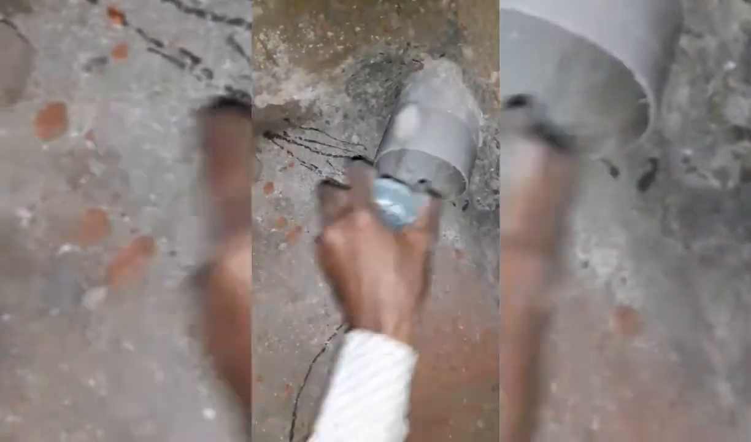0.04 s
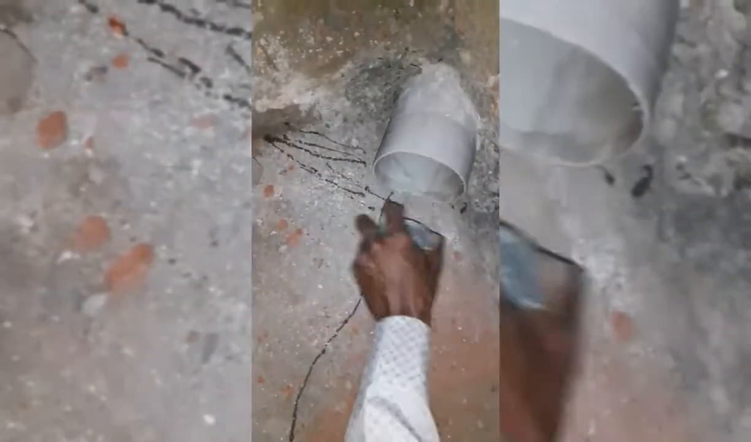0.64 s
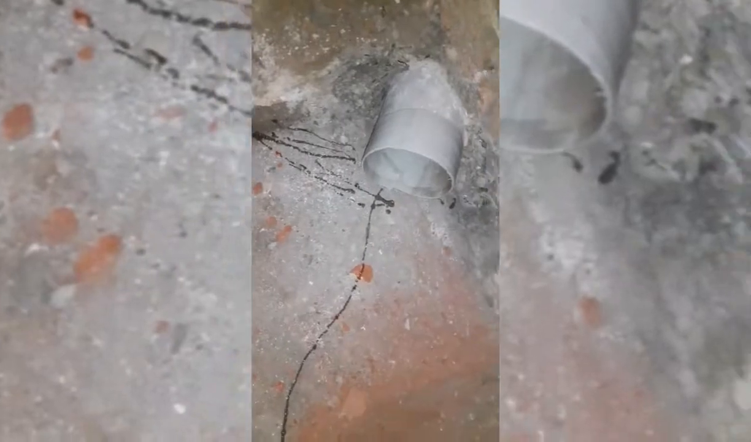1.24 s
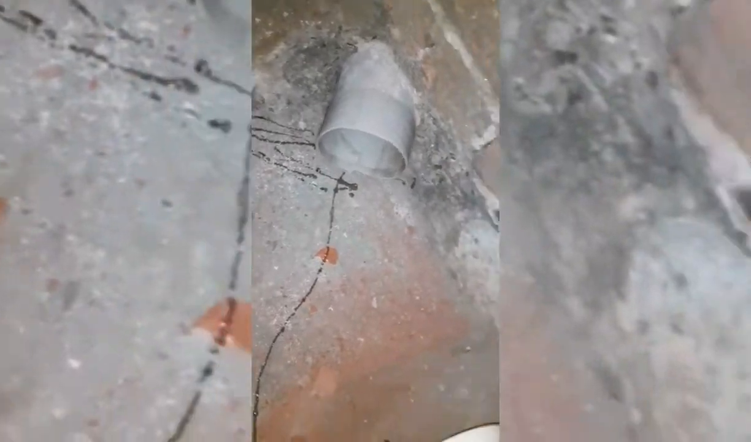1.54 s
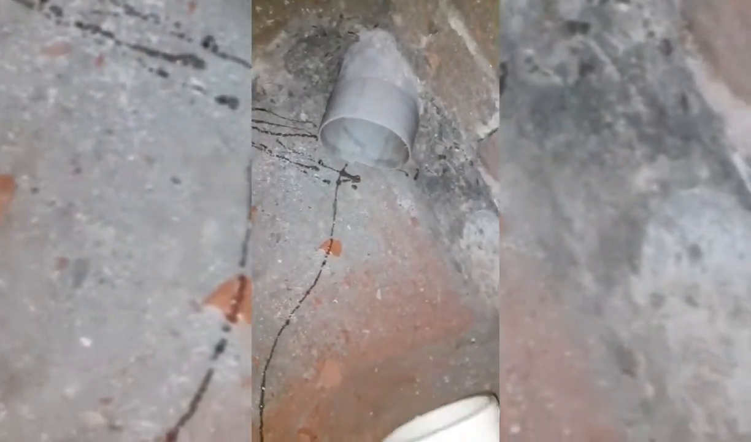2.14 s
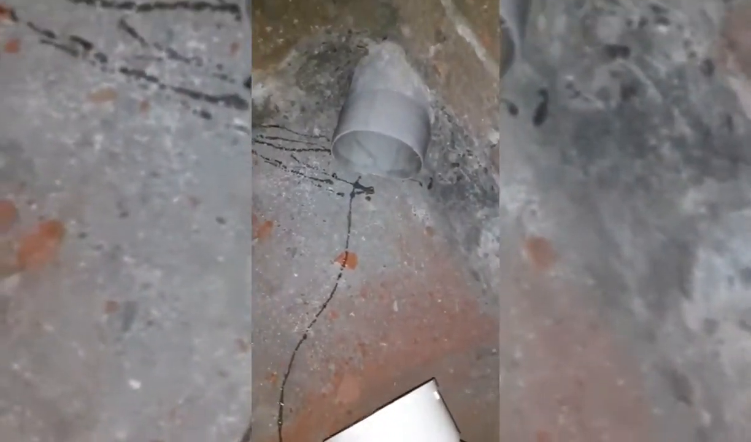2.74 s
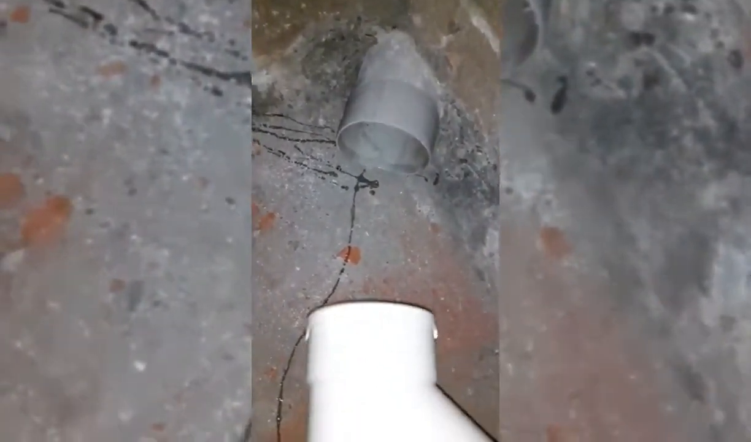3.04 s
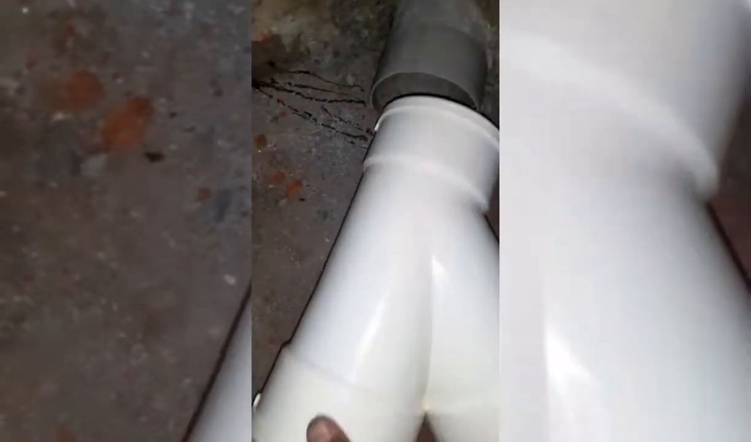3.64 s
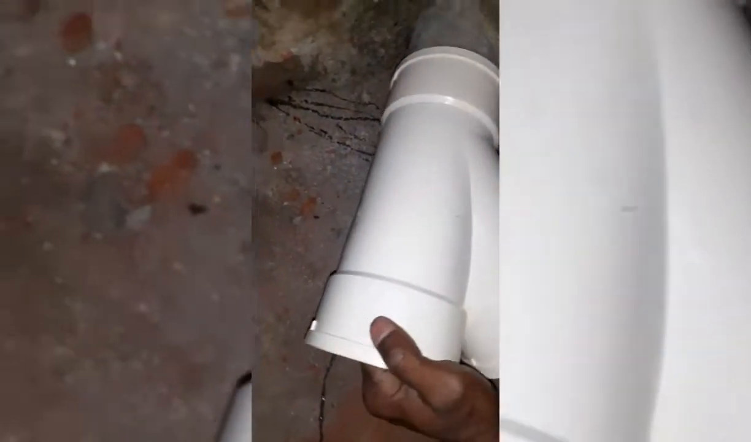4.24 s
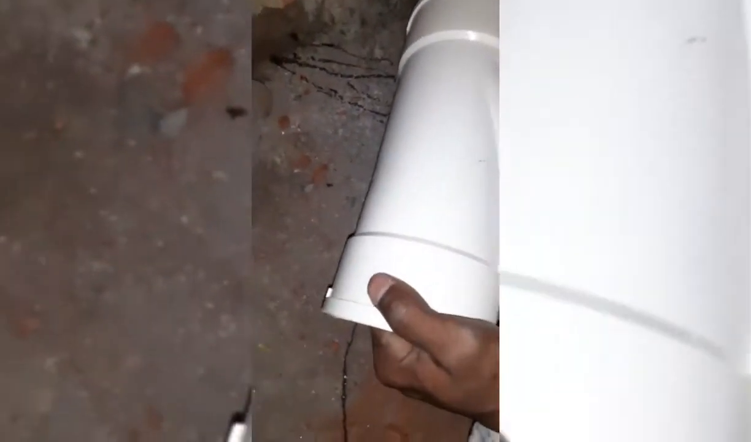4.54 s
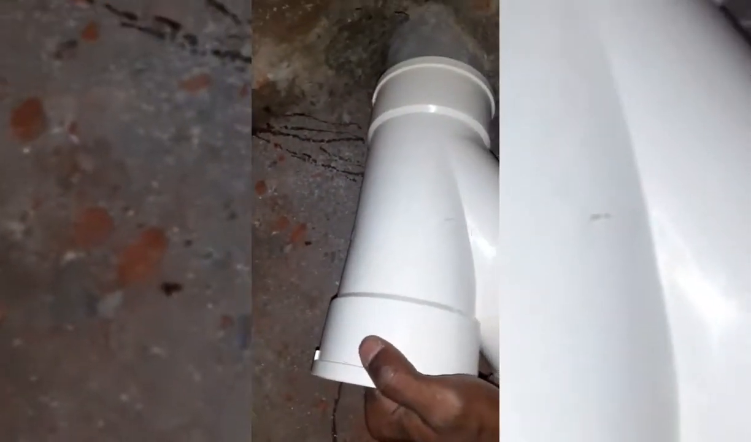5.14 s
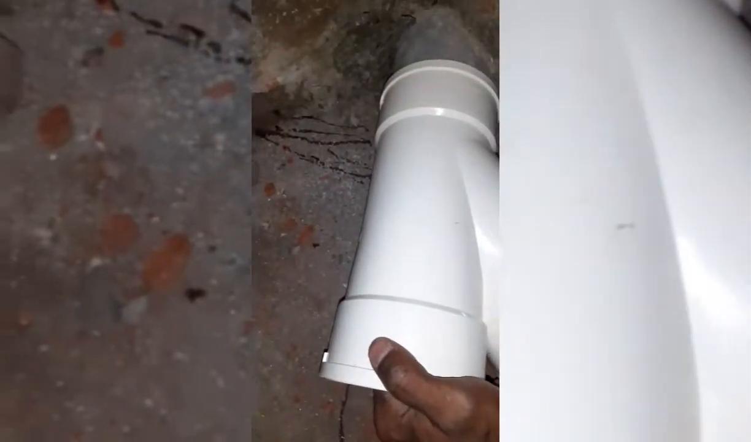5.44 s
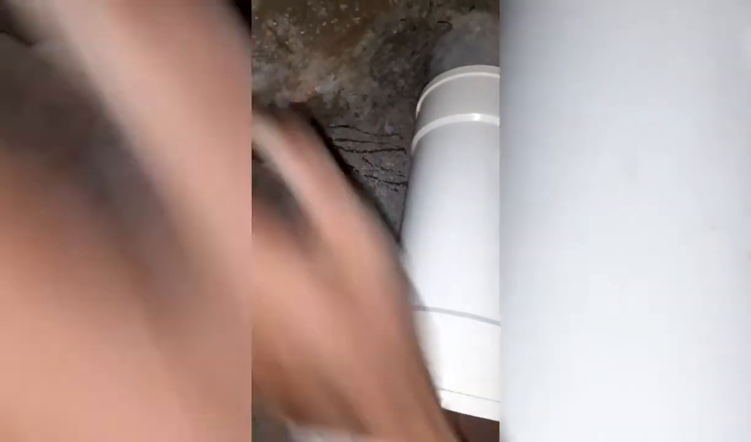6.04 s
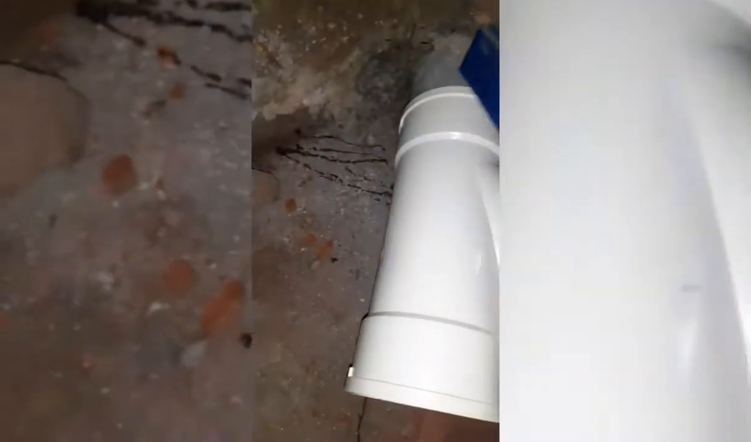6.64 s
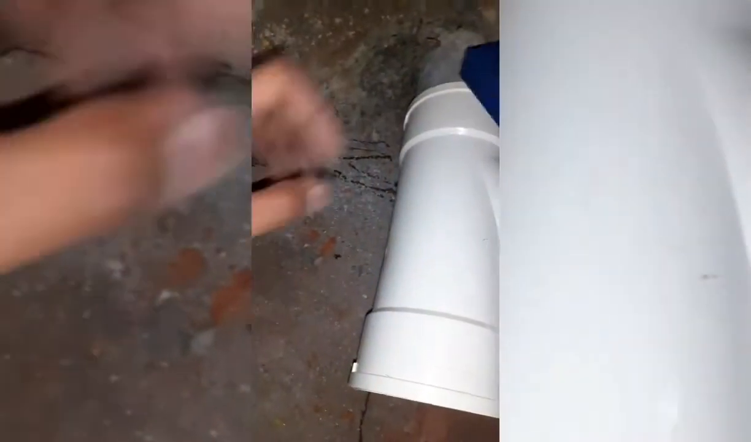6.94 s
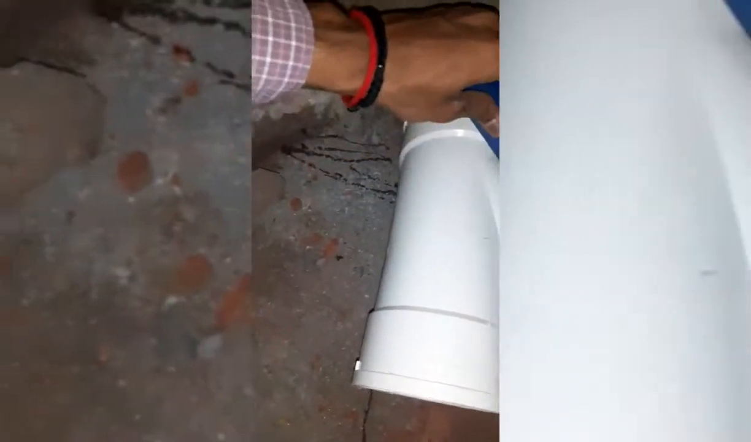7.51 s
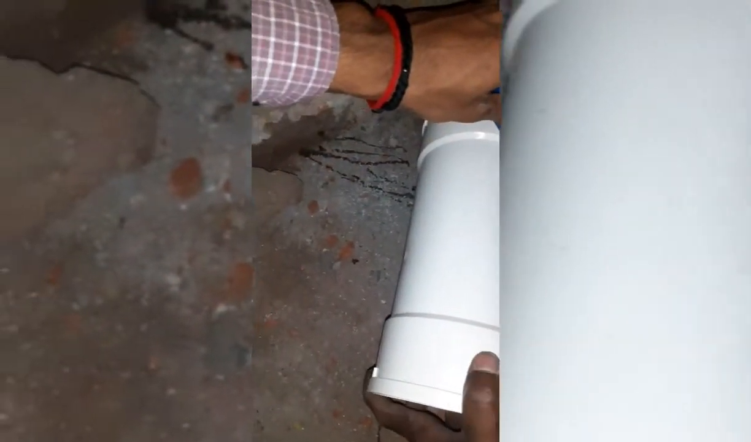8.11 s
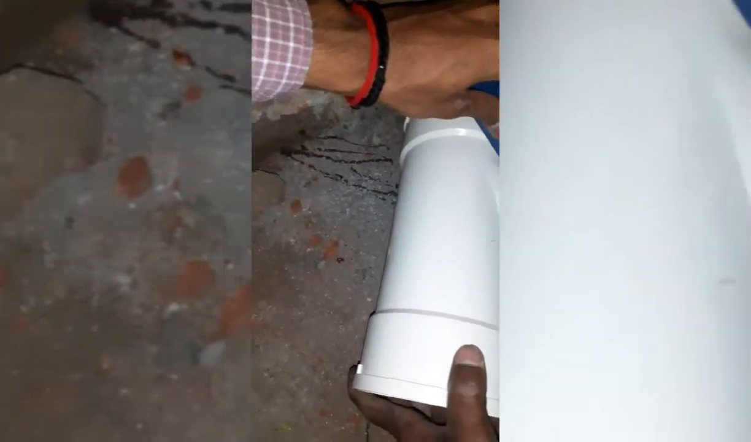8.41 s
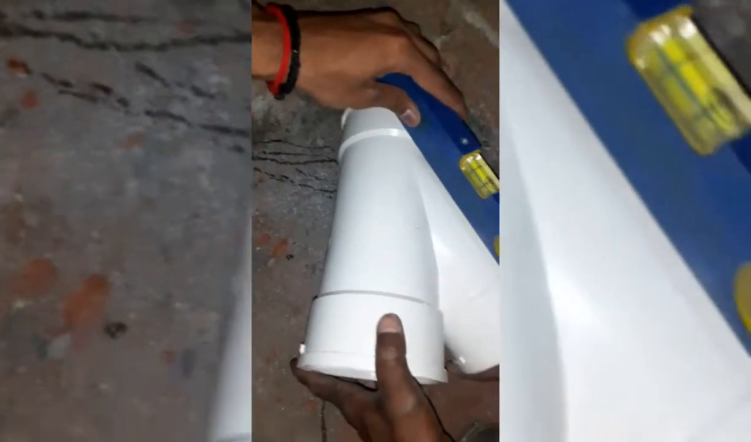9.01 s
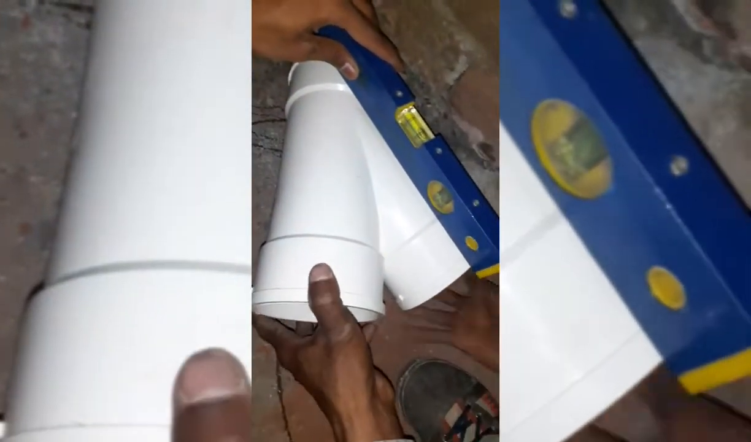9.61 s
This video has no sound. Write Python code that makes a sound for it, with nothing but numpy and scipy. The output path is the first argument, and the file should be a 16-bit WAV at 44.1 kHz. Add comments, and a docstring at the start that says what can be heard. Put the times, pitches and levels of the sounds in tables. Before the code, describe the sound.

A faint low hum runs throughout in a small bare room, with the work close to the microphone and slightly to the right. Between 0.5 and 0.9 seconds a small plastic case scuffs on gritty concrete. Soft rubbing, a light knock and small scrapes follow until about 2.5 seconds. From 3 seconds a plastic pipe fitting scrapes and knocks hollowly as it is pushed onto a drain pipe, and at 3.8 seconds the joint closes with a short, loud, hollow boom. Lighter bumps and scrapes come just after 4 seconds and at 5. A sharp scrape at 6.3 seconds leads into a quick run of about ten ringing clacks from 6.6 to 7.5 seconds, as a spirit level is set on the fitting. After that come faint rubbing of hands on plastic, a dull bump at 8.7 seconds and two tiny knocks just past 9.

```python
"""Fitting a drain pipe in a small bare room.

Close to a hand-held phone, over a steady low hum, a small plastic case scuffs the concrete floor.
A branch fitting is slid over it and pushed onto a drain pipe, and a spirit level is set on top.
Grit scrapes and hands rub between short hollow knocks that ring the plastic,
and the air in the pipe booms as the joint closes."""
import sys
import numpy as np
from scipy import signal
from scipy.fft import rfft, irfft, next_fast_len
from scipy.io import wavfile
from scipy.ndimage import uniform_filter1d

SR = 44100
rng = np.random.default_rng(int(sys.argv[2]) if len(sys.argv) > 2 else 0)


def wav_out(sig):
    """Save sig, one row per channel (or a flat mono array), as 16-bit PCM at SR to the path in sys.argv[1]."""
    wavfile.write(sys.argv[1], SR, np.round(np.clip(np.atleast_2d(sig).T, -1, 1) * 32767).astype(np.int16))


N = 430857
TIME = np.arange(N) / SR
HIT_TIME = TIME[:SR // 3]
SOFT_DULLING = .4  # share of its treble loss that a soft contact also loses near 2 kHz

# Spectrum of grit under plastic. Each row: frequency in Hz, gain in dB.
GRIT_SPECTRUM = [(150, -11), (450, -4.5), (640, -3.5), (1000, -6), (1270, -2), (1750, -1.5), (2150, -2),
                 (3100, -8), (5500, -12), (8000, -18), (10000, -27), (16000, -26.5)]
# Spectrum of skin and cloth on plastic. Each row: frequency in Hz, gain in dB.
RUB_SPECTRUM = [(50, -7.5), (110, 11.5), (220, -3.5), (370, 8.5), (700, -7), (2200, -6), (3500, -14),
                (7000, -10.5), (10000, -23.5), (16000, -20.5)]


def undb(db):
    """Decibels to gain."""
    return 10 ** (np.asarray(db) / 20)


def unit(x):
    """Scale to rms 1."""
    return x / np.sqrt(np.mean(x ** 2))


def decay(t, t60_s):
    """A fade of 60 dB every t60_s seconds."""
    return np.exp(-np.log(1000) * t / t60_s)


def add(out, s, x):
    """Mix a sound in at s seconds."""
    i = max(int(s * SR), 0)
    out[:, i:i + x.shape[-1]] += x[..., :N - i]


def on_bins(points, size):
    """Read (Hz, value) points on the frequency bins of a signal."""
    hz, value = np.transpose(points)
    return np.interp(np.log(np.fft.rfftfreq(size, 1 / SR) + 1), np.log(hz), value)


def colour(x, points):
    """Filter by (Hz, dB) points."""
    size = next_fast_len(x.shape[-1] + SR // 20)
    return irfft(rfft(x, size) * undb(on_bins(points, size)), size)[..., :x.shape[-1]]


def spread(pair):
    """Two unrelated signals become the two microphones: alike in the bass, apart in the treble."""
    # Each row: frequency in Hz, likeness of left and right from 0 to 1.
    likeness = [(100, .93), (600, 0.69), (1100, .25), (2500, 0.056)]
    size = next_fast_len(pair.shape[-1])
    like = on_bins(likeness, size)
    mid, side = rfft(pair, size) * np.sqrt([(1 + like) / 2, (1 - like) / 2])
    return irfft(np.array([mid + side, mid - side]), size)[:, :pair.shape[-1]]


def band(hz, width_hz):
    """Noise in one steep resonance, rms 1."""
    size = next_fast_len(N)
    detune = (np.fft.rfftfreq(size, 1 / SR) - hz) / width_hz
    spectrum = rfft(rng.standard_normal((2, size))) / (1 + 2 * detune ** 2)
    return unit(spread(irfft(spectrum, size))[:, :N])


def grains(size, per_s, scatter_db, smear_s):
    """Tiny slips of random strength, each a short burst of noise."""
    slips = (rng.random(size) < per_s / SR) * undb(scatter_db * np.minimum(rng.exponential(size=size), 4))
    power = signal.lfilter([1], [1, -np.exp(-1 / (smear_s * SR))], slips ** 2)
    return spread(rng.standard_normal((2, size)) * np.sqrt(power))


def waver(size, per_s):
    """Random levels held briefly and smoothed."""
    hold = int(SR / per_s)
    return 0.85 * uniform_filter1d(rng.standard_normal(size)[np.arange(size) // hold], hold)


def stroke(half_s, squareness):
    """Speed of a hand movement over one second: it builds, peaks in the middle and stops."""
    return np.exp(-np.abs((TIME[:SR] - .5) / half_s) ** squareness)


def room_tone():
    """All around the microphones: a wavering low hum, still air and a faint narrow hiss."""
    # Resonances of the hum. Each row: frequency in Hz, width in Hz, relative level in dB.
    hum_bands = [(76, 12, -5.5), (91.4, 1.7, -4), (114, 13, -1)]
    # The hum swells and sinks. Each row: time in seconds, level in dB.
    hum_levels = [(0, -58), (1.7, -55.5), (2.7, -55.5), (3.6, -49), (4.5, -55), (6.6, -50.5), (7.6, -60)]
    # Spectrum of the still air. Each row: frequency in Hz, gain in dB.
    air_spectrum = [(25, -24), (60, -12.5), (120, 4.5), (200, -12.5), (350, -20), (600, -32.5),
                    (1000, -33.5), (2000, -44), (3200, -42), (16000, -43.5)]
    hum = unit(sum(undb(db) * band(hz, width_hz) for hz, width_hz, db in hum_bands))
    hum *= undb(np.interp(TIME, *np.transpose(hum_levels)))
    air = undb(-62) * unit(colour(spread(rng.standard_normal((2, N))), air_spectrum))
    hiss = undb(-84) * band(hz=1650, width_hz=100)
    return hum + air + hiss


def reverberate(x):
    """The hollow pipe and the bare walls add a short tail, strongest in the low mids."""
    t = TIME[:SR // 2]
    build_up = 1 - np.exp(-t / .008)
    tail = spread(rng.standard_normal((2, len(t)))) * decay(t, t60_s=.33) * build_up
    tail /= np.sqrt(np.sum(tail ** 2) / 2)
    tail = colour(tail, [(220, 0), (380, 13), (520, 13), (600, -6), (1100, -19), (6000, -9)])
    return x + undb(-20) * signal.fftconvolve(x, tail, axes=1)[:, :N]


def shifting_grip():
    """Fingers never lie quite still: a very faint rustle comes and goes."""
    return undb(-78) * unit(colour(grains(N, per_s=30, scatter_db=2, smear_s=.03), RUB_SPECTRUM))


def rubbing():
    """Hands and sleeves slide over the plastic with uneven pressure; specks of dust tick now and then."""
    # Each row: fastest moment in seconds, half length in seconds, level in dB.
    rubs = [(1.06, 0.071, -61.5), (1.64, 0.15, -54), (1.93, 0.038, -50), (2.185, 0.13, -51.5),
            (2.47, 0.055, -51), (3.1, 0.13, -49.5), (3.581, 0.11, -39), (4.19, 0.16, -50),
            (4.719, 0.048, -58), (5.2, 0.11, -66), (5.93, 0.073, -56), (6.115, 0.057, -51.5),
            (6.441, 0.072, -58.5), (7.049, 0.27, -51.5), (7.872, 0.24, -64.5), (8.738, .05, -61.5),
            (9.369, 0.19, -58), (9.665, 0.1, -60)]
    middling_db, waver_db = -52, 0.5
    out = np.zeros((2, N))
    for s, half_s, db in rubs:
        slips = grains(SR, per_s=1100, scatter_db=2.5, smear_s=.003)
        dust = grains(SR, per_s=30, scatter_db=2, smear_s=.0025)
        specks = undb(-7) * unit(colour(dust, GRIT_SPECTRUM))
        # the gentler the rub, the more it is a dull rustle from the hollow body
        hollow_db = 0.5 + 0.24 * (middling_db - db)
        friction = colour(unit(colour(slips, RUB_SPECTRUM)), [(220, 0), (350, hollow_db), (700, 0)])
        pressure = undb(db + waver_db * waver(SR, per_s=15))
        add(out, s - .5, pressure * (friction + specks) * stroke(half_s, squareness=1.4))
    return out


def drags():
    """Plastic drags on concrete or plastic: grit catches, slips and rings the shell's dense modes."""
    # Each row: hardest push in seconds, level in dB, bass in dB, treble in dB.
    pushes = [(.497, -42.5, -35, -2.5), (0.72, -33.5, -20.5, -2.5), (0.801, -32.5, -19, -3.5),
              (.930, -55.5, 17, 4), (1.54, -50, 18, -6), (2.269, -38, 8.5, 3), (3.037, -36, 6, -3.5),
              (3.109, -33, 16, 2.5), (3.287, -37.5, 11, -9), (3.346, -38, 7, 3.5), (3.473, -39, 8, -9),
              (3.534, -34, 6, 3), (3.659, -34, 12.5, 5.5), (3.808, -31, 9.5, -9.5), (4.272, -38, 10.5, -8),
              (5.03, -45, 7, -19.5), (6.23, -42.5, -5, -5), (6.288, -27, -13, -1), (6.807, -39.5, -8, -9)]
    out = np.zeros((2, N))
    for s, db, bass_db, treble_db in pushes:
        shell = rng.standard_normal((1, SR // 20)) * decay(TIME[:SR // 20], t60_s=0.031)
        slips = grains(SR, per_s=860, scatter_db=1, smear_s=0.00055)
        grit = colour(signal.fftconvolve(slips, shell, axes=1)[:, :SR], GRIT_SPECTRUM)
        dull_db = SOFT_DULLING * min(treble_db, 0)
        contact = [(400, bass_db), (650, 0), (1400, 0), (2200, dull_db), (4500, treble_db)]
        scrape = unit(colour(grit, contact))
        add(out, s - .5, undb(db) * scrape * stroke(half_s=0.02, squareness=1.7))
    return out


def air_booms():
    """As the fitting is jolted or the joint closes, one low mode of the air column swells and fades."""
    # Each row: start in seconds, pitch in Hz, peak level in dB, swell in seconds.
    booms = [(1.708, 177, -37, 0.0059), (3.321, 305, -33.5, 0.0074), (3.806, 354.6, -19, 0.0094),
             (3.847, 343.5, -24, 0.0077), (3.88, 211, -30.5, 0.0047)]
    out = np.zeros((2, N))
    for s, hz, db, swell_s in booms:
        age = HIT_TIME / swell_s
        add(out, s, undb(db) * age * np.exp(1 - age) * np.sin(2 * np.pi * hz * HIT_TIME))
    return out


def level_blow(x, db):
    """Set the rms level of a blow over its first 15 ms."""
    return undb(db) * x / np.sqrt(np.mean(x[..., :SR * 15 // 1000] ** 2))


def ring(modes, db, rise_s, detune=0.011):
    """Struck modes swell and die, the high ones sooner; the grip shifts their pitch a little."""
    out = 0
    for hz, mode_db in modes:
        shift, lag = rng.standard_normal(2)
        t60_s = .062 * (1000 / hz) ** .25
        phase = np.array([[1], [-1]]) * lag * min(hz / 2500, 1)  # out of step at the two microphones
        tone = np.sin(2 * np.pi * hz * (1 + detune * shift) * HIT_TIME + phase)
        out = out + undb(mode_db) * decay(HIT_TIME, t60_s) * tone
    return level_blow(out * (1 - np.exp(-HIT_TIME / rise_s)), db)


def knock(db, hollow_db, bass_db, hardness_db, rise_s, hold_s):
    """The fitting's rim chatters for a few ms; its wall clacks and its hollow body rings on."""
    # Spectrum of the dense, quickly damped wall modes. Each row: frequency in Hz, gain in dB.
    wall_spectrum = [(120, -39.5), (300, -4.5), (600, -3), (1300, 1), (2100, 0), (3000, -15), (5500, -17),
                     (8000, -19.5), (10000, -29), (16000, -32)]
    # Modes of the hollow fitting. Each row: frequency in Hz, relative level in dB.
    body_modes = [(358, -11), (517, -10.5), (598, 3.5), (899, -9.5), (1245, -7), (1340, -10), (1911, -18),
                  (2116, -16), (3490, -27.5), (5276, -25.5)]
    chatter = grains(len(HIT_TIME), per_s=3000, scatter_db=1.5, smear_s=.001)
    chatter *= 1 - np.exp(-HIT_TIME / rise_s)
    low = colour(chatter, [(1500, 0), (5000, -30)])
    free_s = np.maximum(HIT_TIME - hold_s, 0)
    wall = low * decay(free_s, t60_s=.052) + (chatter - low) * decay(free_s, t60_s=.044)
    # a soft, broad contact gives more bass, a hard edge more treble
    dull_db = SOFT_DULLING * min(hardness_db, 0)
    contact = [(450, bass_db - 0.58 * hardness_db), (1200, 0), (2000, dull_db),
               (4500, hardness_db), (12000, 1.1 * hardness_db)]
    clack = level_blow(colour(colour(wall, wall_spectrum), contact), db)
    return clack + ring(body_modes, db + hollow_db, rise_s=0.006)


def fitting_bumps():
    """The fitting bumps floor and pipe: a soft bump rings its hollow body, a hard one its socket rim."""
    # Each row: start in seconds, level in dB, hardness of the contact in dB of treble.
    bumps = [(1.694, -45, 17.5), (1.891, -55.5, 30), (3.089, -33, 3), (3.348, -26, -2), (3.504, -36, -1),
             (3.621, -31.5, 15), (4.069, -48, 15), (4.13, -39.5, 2.5), (5.012, -38, -15), (8.667, -43, -12),
             (9.163, -59, -2), (9.315, -60, -5)]
    # Modes of the socket rim. Each row: frequency in Hz, relative level in dB.
    rim_modes = [(2260, -10.5), (2410, -3), (2600, -1.5), (5220, -13.5)]
    out = np.zeros((2, N))
    for s, db, hardness_db in bumps:
        hollow_db = -23.5 - 0.73 * hardness_db
        rim_db = -6.5 + min(2 * hardness_db, 3)
        bump = knock(db, hollow_db, bass_db=5.5, hardness_db=hardness_db, rise_s=.0014, hold_s=.007)
        add(out, s, bump + ring(rim_modes, db + rim_db, rise_s=0.00083))
    return out


def spirit_level_taps():
    """The spirit level lands on the fitting; the less a tap rings the fitting, the more the tool rings."""
    # Each row: start in seconds, level in dB, hardness in dB of treble, fitting's ring in relative dB.
    taps = [(6.637, -25, 2.5, 8), (6.682, -27.5, 0, 7.5), (6.702, -29, 5, 10), (6.841, -29.5, 1.5, -13.5),
            (6.865, -32, -5, -10), (7.082, -24, 3.5, -33), (7.213, -30, -4, 0.5), (7.223, -33, -6.5, 0),
            (7.286, -22.5, -2, -0.5), (7.428, -32, -11.5, 1), (7.505, -47.5, -32, -6)]
    # Modes of the spirit level. Each row: frequency in Hz, relative level in dB.
    tool_modes = [(1100, -0.5), (1281, -20), (1967, -1), (2085, -2.5)]
    firm_db, rebound_s, rebound_db = -29, .0095, -9
    out = np.zeros((2, N))
    for s, db, hardness_db, hollow_db in taps:
        tool_db = -12 - 0.56 * hollow_db
        blows = [(s, db)]
        if db > firm_db:  # a firm tap rocks back once
            blows.append((s + rebound_s, db + rebound_db))
        for at_s, blow_db in blows:
            tap = knock(blow_db, hollow_db, bass_db=-2.5, hardness_db=hardness_db,
                        rise_s=.0018, hold_s=.003)
            add(out, at_s, tap + ring(tool_modes, blow_db + tool_db, rise_s=0.003))
    return out


def scene():
    """The work lies nearer the right microphone; the room tone surrounds both, leaning right."""
    # Balance of the work at the microphones. Each row: frequency in Hz, left minus right in dB.
    balance = [(100, -2), (350, -5), (600, -2), (1100, -6), (2100, -12), (4000, -8), (7000, -3),
               (10000, 4.98), (16000, 2.92)]
    work = fitting_bumps() + spirit_level_taps() + drags() + air_booms() + rubbing() + shifting_grip()
    left, right = reverberate(work)
    left = colour(left, [(hz, db / 2) for hz, db in balance])
    right = colour(right, [(hz, -db / 2) for hz, db in balance])
    return np.array([left, right]) + room_tone() * undb([[-1.75], [1.75]])


def record(dry):
    """The phone cuts the top of the treble steeply."""
    top_hz = 15900
    return signal.sosfilt(signal.ellip(10, .2, 70, top_hz, fs=SR, output="sos"), dry)


dry = scene()
out = record(dry)
wav_out(out)
```